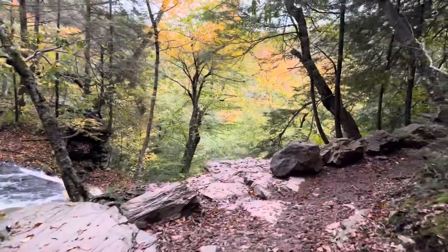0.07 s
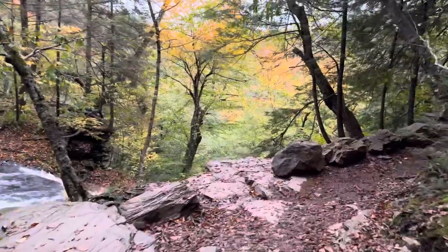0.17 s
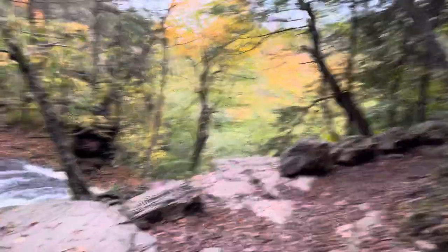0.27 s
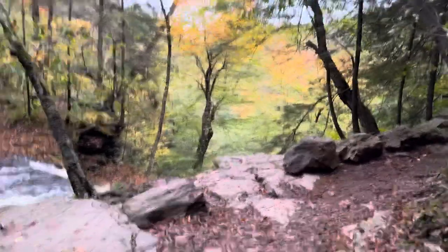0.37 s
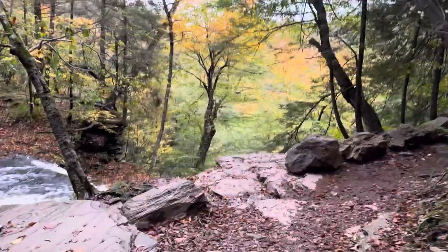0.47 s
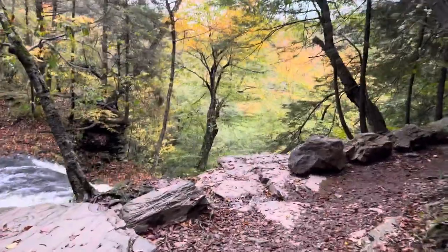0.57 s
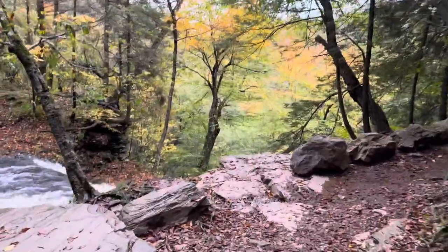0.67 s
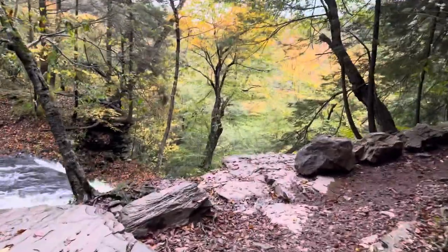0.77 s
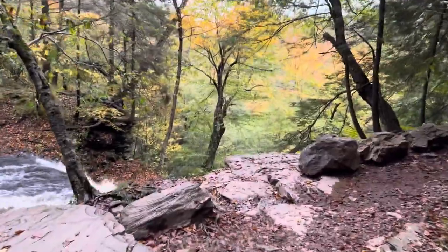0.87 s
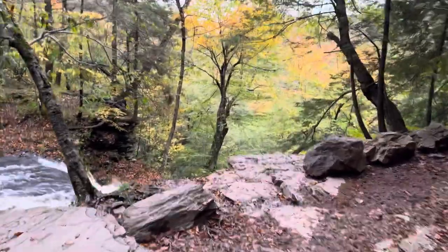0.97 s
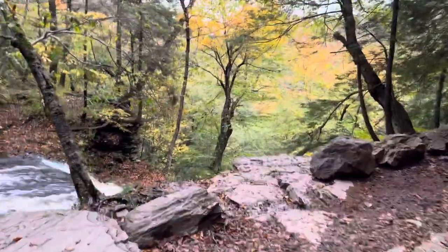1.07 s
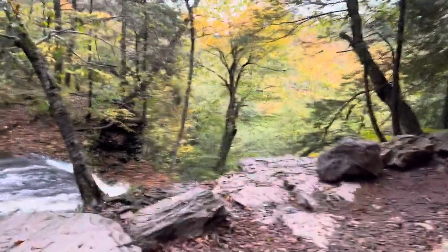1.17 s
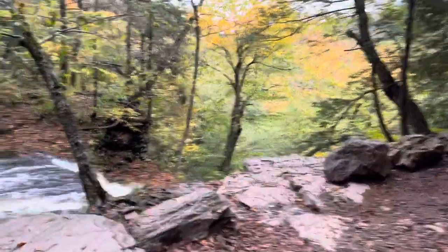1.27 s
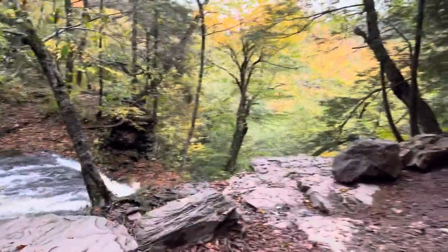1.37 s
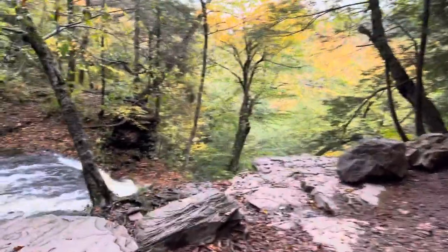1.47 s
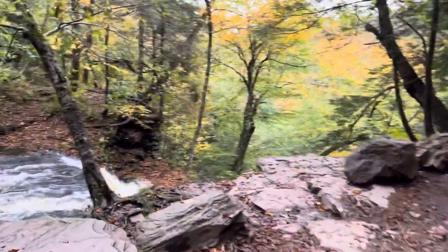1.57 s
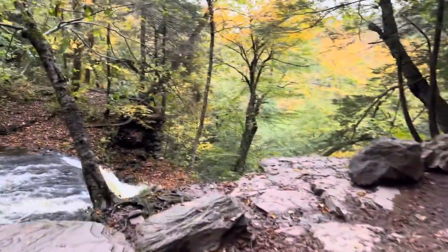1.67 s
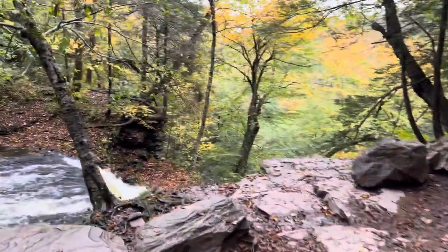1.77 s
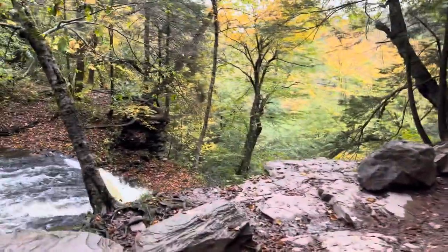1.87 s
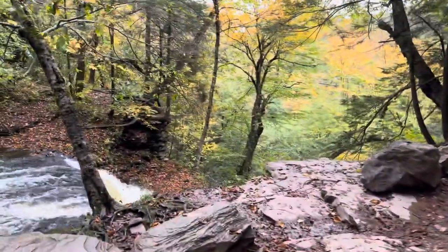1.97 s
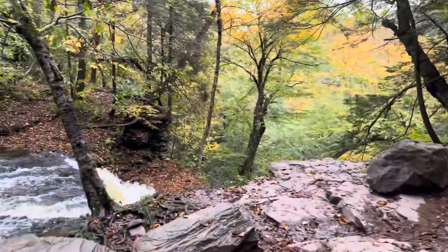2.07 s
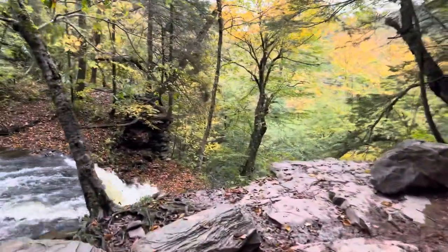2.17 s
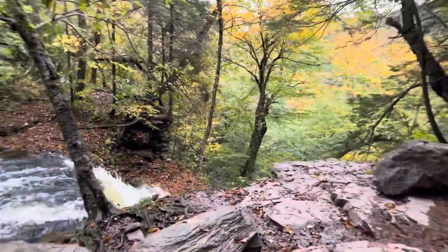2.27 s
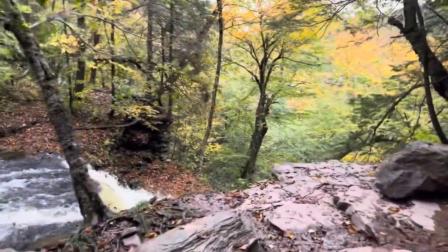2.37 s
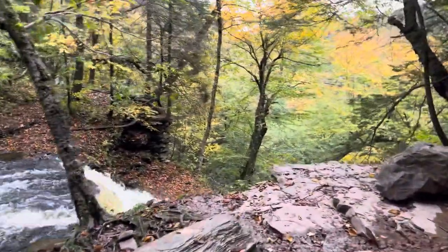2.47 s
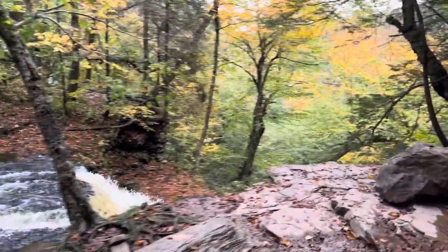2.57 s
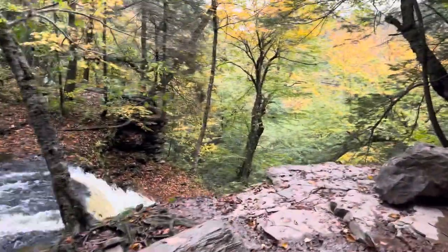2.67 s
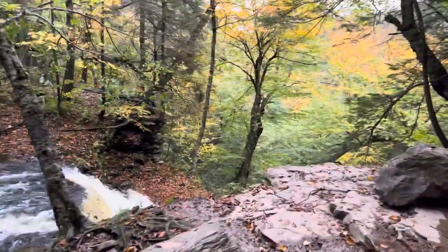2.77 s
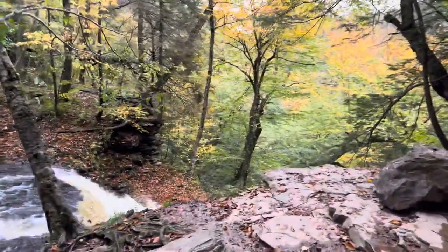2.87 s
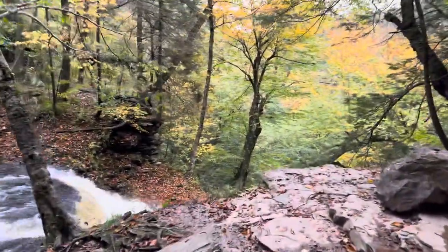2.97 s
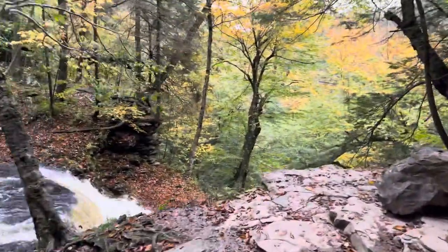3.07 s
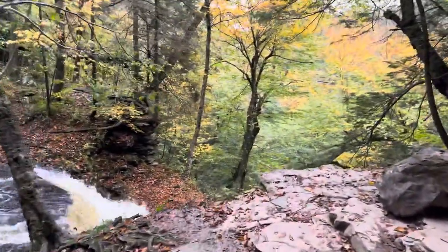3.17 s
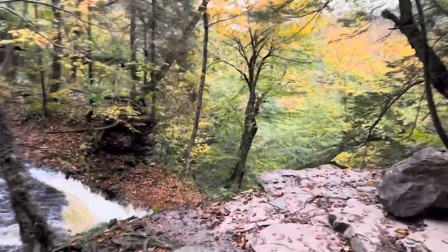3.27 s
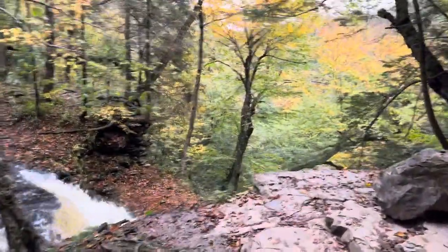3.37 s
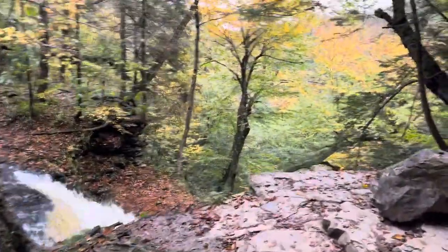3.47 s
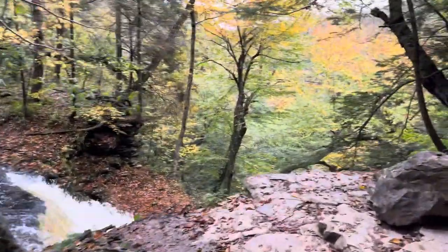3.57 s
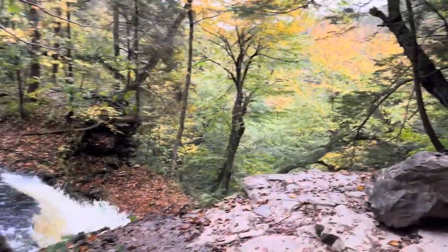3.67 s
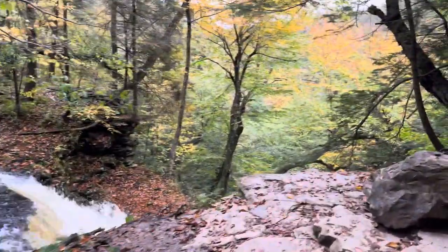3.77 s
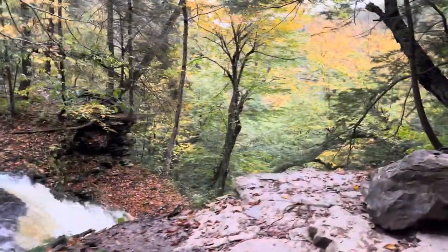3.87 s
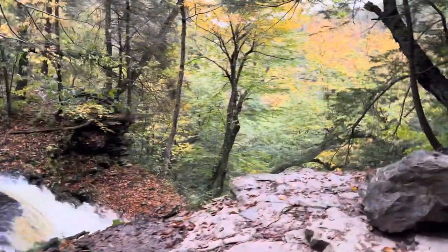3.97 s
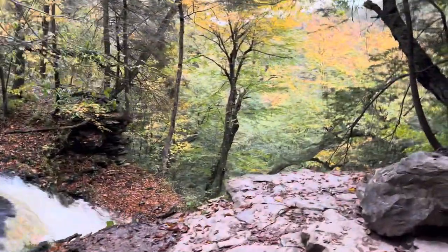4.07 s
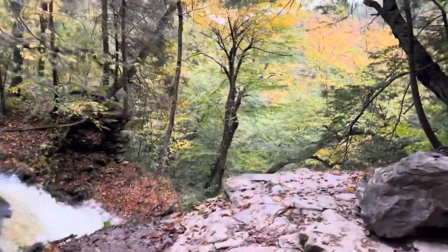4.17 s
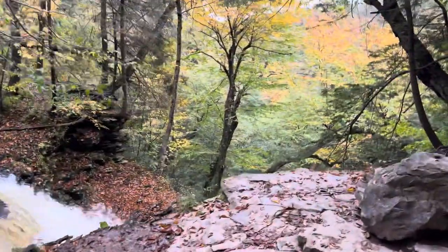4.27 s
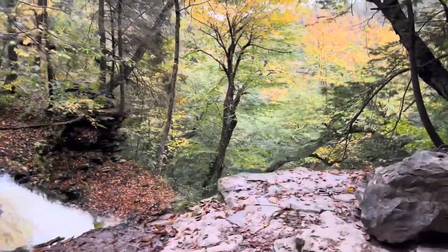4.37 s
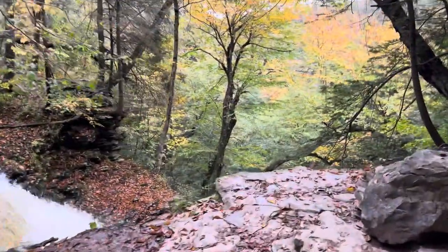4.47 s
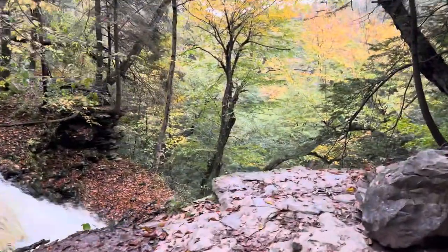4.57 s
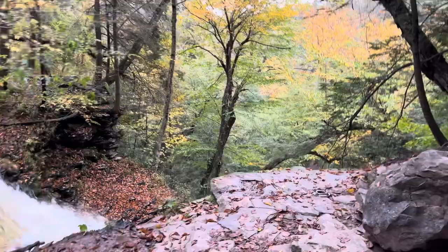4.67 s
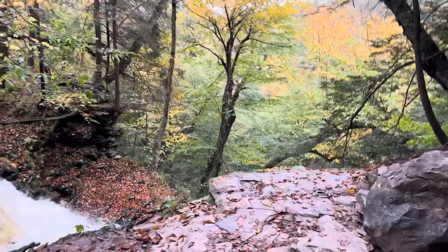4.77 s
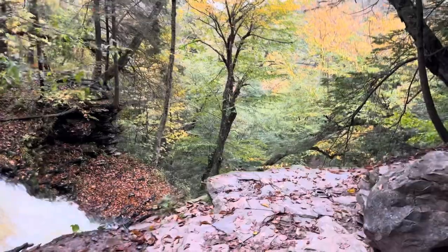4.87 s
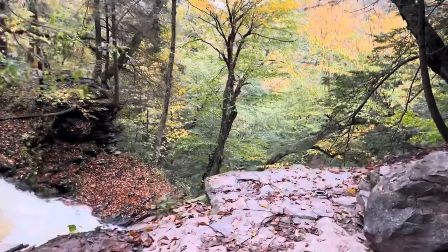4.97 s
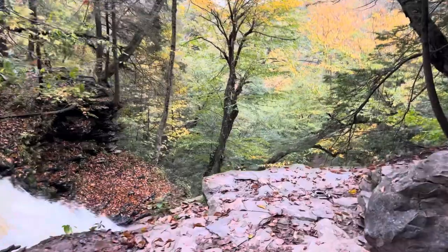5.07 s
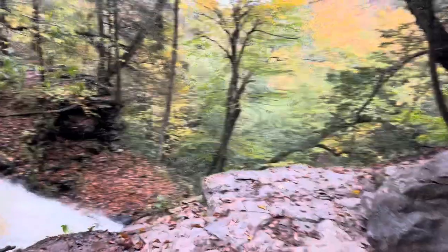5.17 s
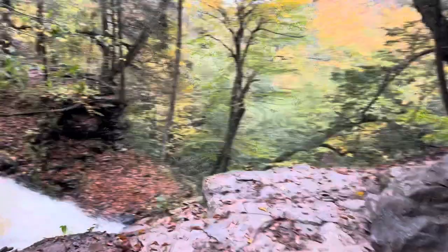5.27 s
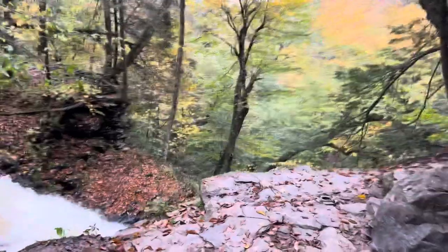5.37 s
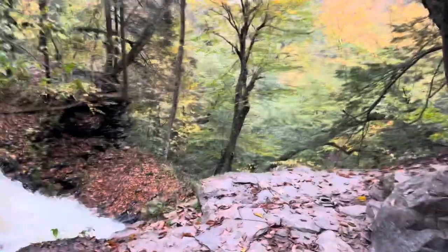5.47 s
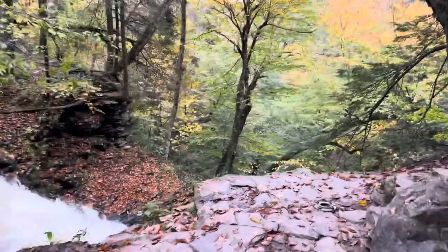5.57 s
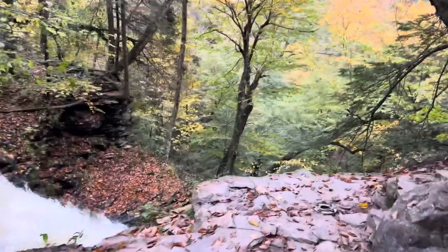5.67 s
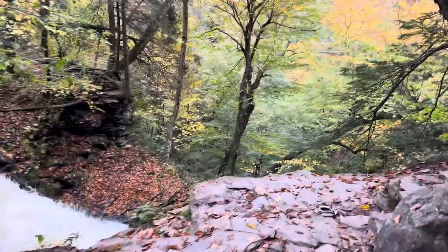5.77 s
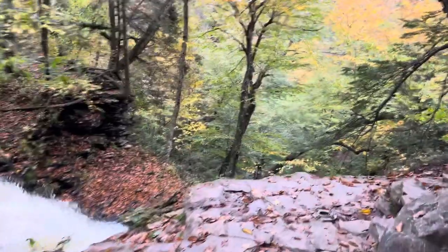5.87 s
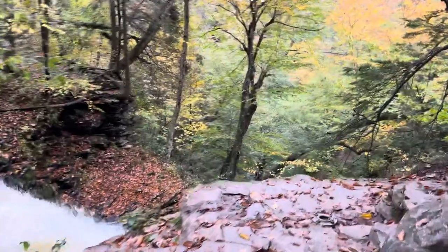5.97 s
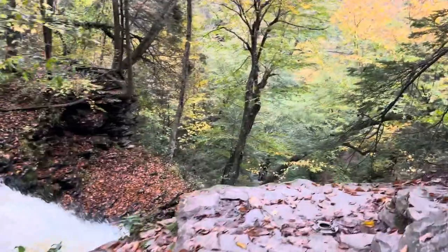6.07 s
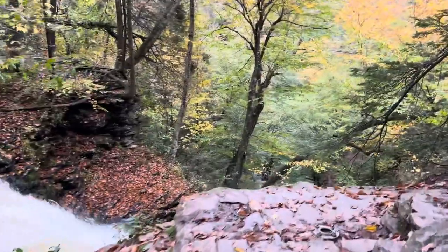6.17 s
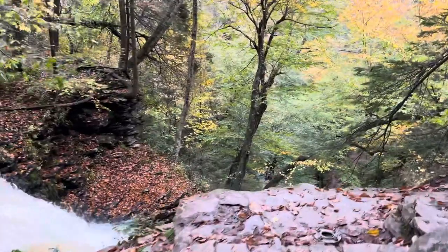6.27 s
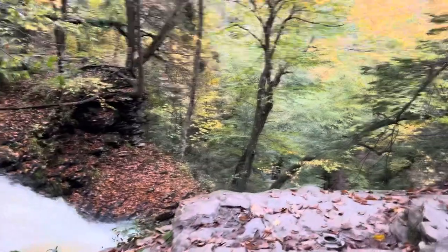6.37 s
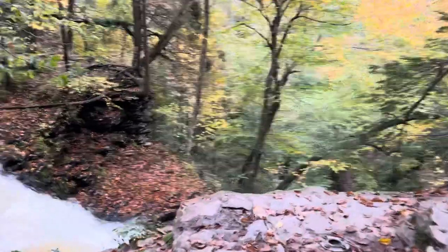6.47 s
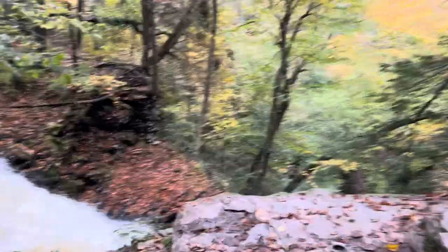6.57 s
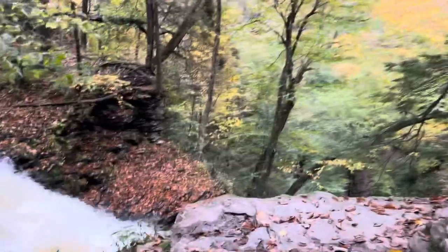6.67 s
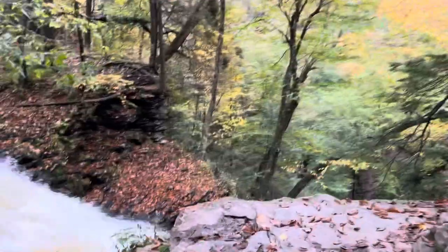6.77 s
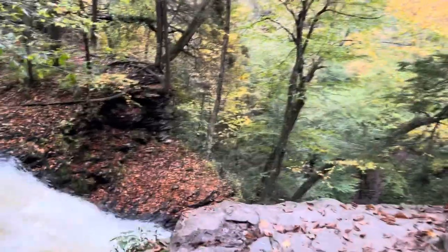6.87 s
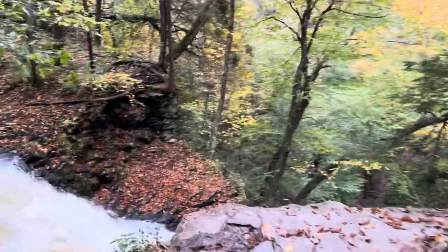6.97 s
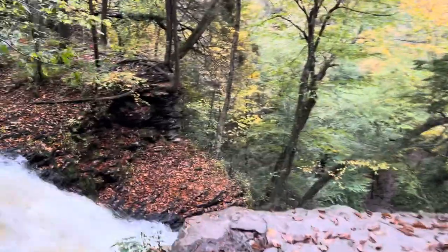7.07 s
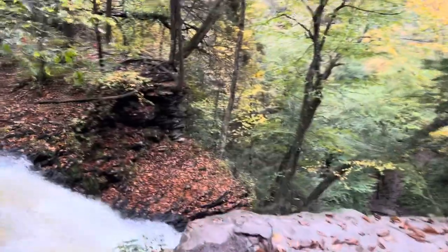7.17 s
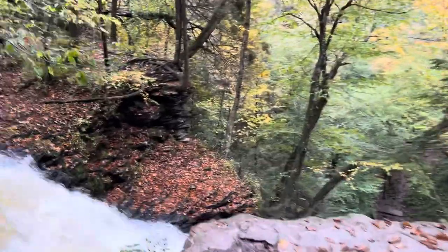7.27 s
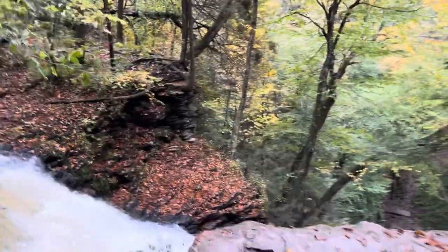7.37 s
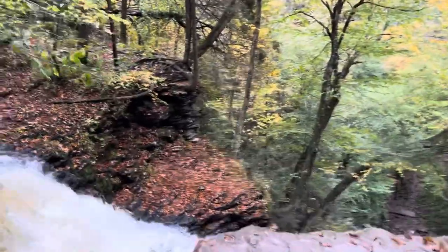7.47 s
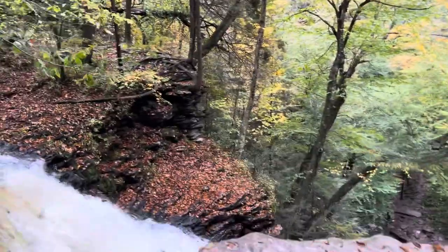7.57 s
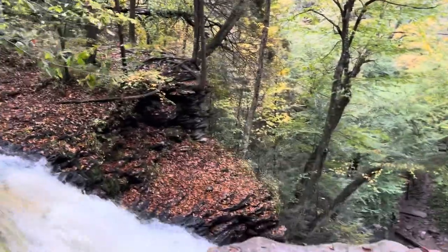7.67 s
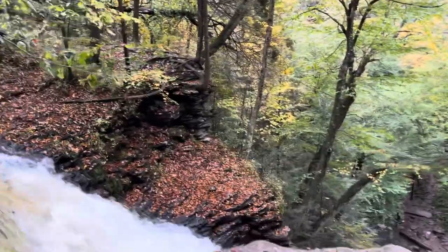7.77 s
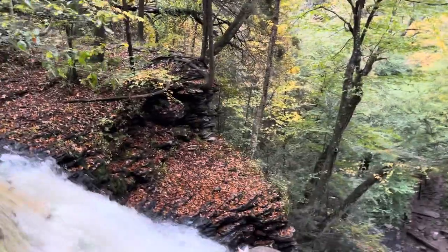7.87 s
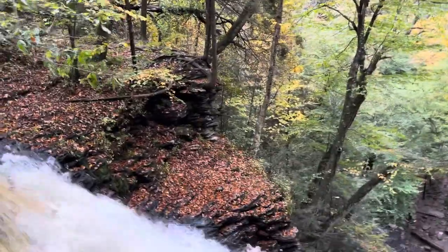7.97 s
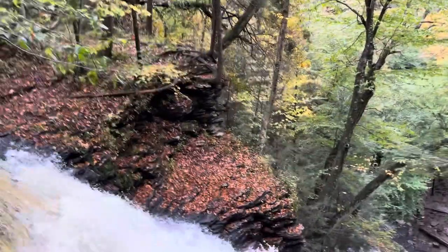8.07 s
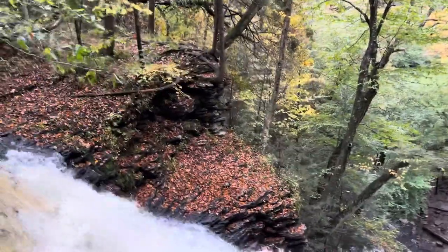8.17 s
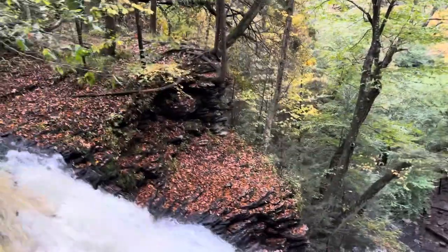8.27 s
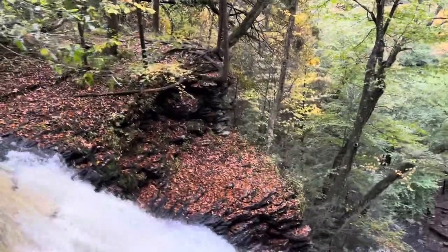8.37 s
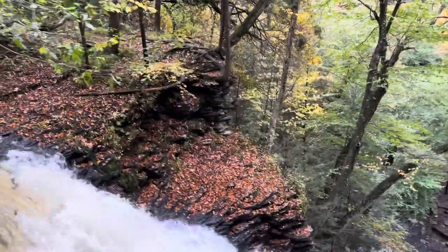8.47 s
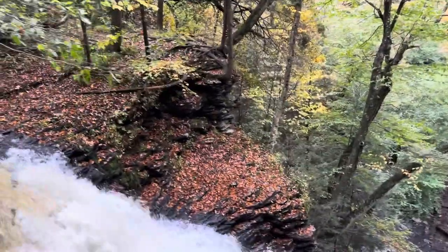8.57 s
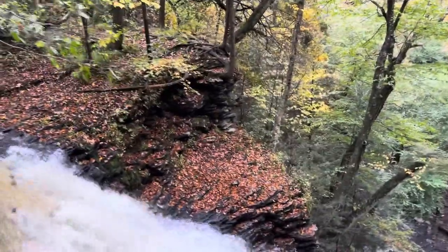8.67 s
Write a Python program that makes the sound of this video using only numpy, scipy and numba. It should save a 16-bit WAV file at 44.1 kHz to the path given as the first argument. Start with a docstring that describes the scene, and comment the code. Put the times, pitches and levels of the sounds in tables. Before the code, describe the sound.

A heavy waterfall roars steadily with deep rumble and broad white-water rush, growing louder and brighter as the listener walks to the brink.

```python
"""A deep rumble and broad rush: a waterfall in heavy flow, heard on a phone carried over bare rock to the brink.
The plunge pool booms and surges: banded turbulent noise plus the decaying sines of large air pockets.
White water (noise, small bubbles, splash clusters) and spray (bright noise, tiny bubbles) lie farther off.
All three grow louder as their distances shrink; bands of the roar swell and thin out, from splashes and rock.
The draught of the fall buffets the two microphone ports with low noise, harder in the gusts."""
import sys
import numpy as np
from scipy import signal
from scipy.fft import rfft, irfft
from scipy.io import wavfile
from scipy.ndimage import uniform_filter1d
from numba import njit

SR = 44100
rng = np.random.default_rng(int(sys.argv[2]) if len(sys.argv) > 2 else 0)


def wrap_up_sound(samples):
    """Save the sound to the file named by the first command line argument, as 16-bit audio."""
    columns = np.atleast_2d(samples).T
    # keep every value between -1 and 1, then stretch to whole-number steps
    tamed = np.clip(columns, -1, 1)
    steps = np.round(tamed * 32767).astype(np.int16)
    wavfile.write(sys.argv[1], SR, steps)


N = 384111
TIME = np.arange(N) / SR  # s
FREQ = np.maximum(np.fft.rfftfreq(N, 1 / SR), 1)  # Hz

# white-water spectrum, shared by foam, bubbles and splashes: freq_hz, density_db (per Hz)
RUSH_SPECTRUM = [(200, -26), (400, 0), (580, 1), (850, 0), (1030, -2.5), (1230, -1.45), (1450, -3.5),
                 (2300, -5.5), (3000, -8.5), (4500, -12), (8000, -14.5)]


def plunge_pool(near_db, opening_db_per_db=0.36, rim_hz=150):
    """Turbulence boils and driven-under air pockets ring; the part above the rim corner opens up on approach."""
    # pool spectrum: freq_hz, density_db (per Hz)
    pool_spectrum = [(25, -30), (40, -13.5), (60, -2), (95, -0.4), (170, 0.0), (260, -3), (400, -6.5),
                     (600, -13), (1200, -29.5)]
    boil = churn(pool_spectrum, surge_db=0.2, surge_rate_hz=9.8, flicker_db=0.46, flicker_rate_hz=14)
    pockets = bubbles(pool_spectrum, rate_hz=400, low_hz=59.5, high_hz=500,
                      cycles=6.6, rise=0.19, scatter_db=1.0)
    pool = stereo_image(boil + undb(-9.0) * pockets)
    return brighten(pool, rim_hz, opening_db_per_db * (near_db - near_db.mean()))


def tumbling():
    """Level in dB of the pool as heavy slugs of water land in it, with lulls between."""
    # surges and lulls: peak_s, change_db, length_s
    surges = [(.8, -2.5, .3), (1.12, 1, 0.23), (3.97, -2, .14), (4.78, 0, .3), (6.1, -0.5, .14),
              (6.23, -2.2, .1), (6.55, -2.5, .17), (7.1, 0.2, 0.18), (7.35, 1, .2), (7.63, -2, 0.1),
              (7.88, 1.3, .12), (8.04, 1.5, 0.089), (8.25, -1.5, 0.29), (8.532, 1, 0.07)]
    return sum(db * swell(s, length_s) for s, db, length_s in surges)


def white_water(near_db, opening_db_per_db=0.047, ledge_hz=900):
    """Foam tears over the ledges, so full of small bubbles and splashes that they fuse into one rush."""
    foam = churn(RUSH_SPECTRUM, surge_db=0.03, surge_rate_hz=12, flicker_db=0.4, flicker_rate_hz=18)
    gurgle = bubbles(RUSH_SPECTRUM, rate_hz=1300, low_hz=451.0, high_hz=4512,
                     cycles=94, rise=0.036, scatter_db=2.5)
    water = stereo_image(foam + undb(-7.5) * gurgle + undb(-8.0) * splashes())
    return unit(brighten(water, ledge_hz, opening_db_per_db * (near_db - near_db.mean())))


def splashes(rate_hz=200, length_s=.035, low_hz=1000, high_hz=7000, spread_octaves=0.074,
             cycles=36, scatter_db=1.3, count=22):
    """Lumps of water slap the ledges; each throws up a short cluster of bubbles of about one size."""
    lumps = int(rate_hz * N / SR)
    when, pitch = rng.random((lumps, 2)).T[:, :, None]
    delay, detune, way = rng.random((lumps, 3, count)).transpose(1, 0, 2)
    hz = low_hz * (high_hz / low_hz) ** pitch
    hz = hz * 2 ** (spread_octaves * (2 * detune - 1))  # plus or minus the spread
    strength = hz * undb(scatter_db * rng.standard_normal((lumps, 1)))
    start = when + delay ** 2 * length_s * SR / N  # densest at the slap
    angle = 2 * np.pi * way
    rings = ring(start.ravel(), hz.ravel(), strength.ravel(), angle.ravel(), float(cycles), 0.)
    return unit(colour(rings, RUSH_SPECTRUM))


def spray(near_db, opening_db_per_db=0.89, brink_hz=10000, mist_hz=13500):
    """Droplets hiss and tiny bubbles fizz; the finest hiss comes out from behind the brink as it nears."""
    # spray spectrum: freq_hz, density_db (per Hz)
    spray_spectrum = [(1200, -19), (2500, -5.5), (3500, -.5), (4500, 0), (6000, -.6), (7300, .6),
                      (8000, .6), (9000, 3.4), (9900, -.7), (10700, -5.8), (11600, -6.8), (15600, -6.6)]
    # at the edge the finest spray is in plain view
    edge_s, edge_length_s, edge_db = 8.7, 1.8, 4
    mist = churn(spray_spectrum, surge_db=-0.12, surge_rate_hz=12, flicker_db=1.2, flicker_rate_hz=28)
    fizz = bubbles(spray_spectrum, rate_hz=4500, low_hz=2500, high_hz=15000,
                   cycles=120, rise=.03, scatter_db=2.8)
    hiss = stereo_image(mist + undb(-5.5) * fizz)
    hiss = brighten(hiss, brink_hz, opening_db_per_db * (near_db - near_db.mean()))
    return brighten(hiss, mist_hz, edge_db * swell(edge_s, edge_length_s))


def buffeting(shared=0.3):
    """Eddies thump on each port, harder in the gusts; part of every eddy reaches the other port too."""
    # eddy spectrum: freq_hz, density_db (per Hz)
    eddy_spectrum = [(20, -36), (35, -9), (55, 0.5), (90, 0.5), (140, -6.5), (300, -21.5), (700, -50)]
    # gusts in the draught: peak_s, level_db, length_s
    gusts = [(0.588, -23.5, 0.034), (.89, -27, .12), (1.07, -23, .2), (1.65, -25, .22), (2.22, -24, 0.1),
             (2.617, -17, 0.089), (2.79, -20.5, .05), (3.11, -17, .06), (3.21, -19, .07),
             (3.349, -12.5, 0.063), (3.57, -19, 0.2), (3.717, -16, 0.045), (3.89, -23, .05),
             (4.06, -19, .07), (4.538, -15, .06), (4.66, -25, .12), (5.33, -26, .1), (5.51, -20, .04),
             (5.73, -29, .07), (5.85, -24, .04), (6.1, -19, .09), (7.27, -24, .13), (7.47, -20, .04),
             (7.89, -25, .05)]
    draught_db, right_minus_left_db = -43, 0.5
    # the draught freshens over one open stretch of the path
    open_s, open_length_s, open_db = 3.4, 4.2, 15.5
    eddies = churn(eddy_spectrum, surge_db=0.5, surge_rate_hz=14, flicker_db=-1.0, flicker_rate_hz=24)
    eddies = unit(eddies + shared * eddies[::-1])
    power = undb(draught_db + open_db * swell(open_s, open_length_s)) ** 2
    power = power + sum((undb(db) * swell(s, length_s)) ** 2 for s, db, length_s in gusts)
    lean = undb(right_minus_left_db * np.array([[-.5], [.5]]))
    return eddies * np.sqrt(power) * lean


def shifting_bands(water, drift_octaves=0.023, drift_rate_hz=1.68, waver=0.24, waver_rate_hz=4.5, size=2048):
    """Bands of the roar swell and thin out in turn, some from splashes, some from rock; they slide and waver."""
    # bands of the roar: start_hz, end_hz, width_octaves, peak_db, peak_s, length_s
    roar_bands = [(580, 650, 0.36, -3.5, .6, 2.6), (274, 260, 0.33, 2.5, .9, 1.8),
                  (390, 350, 0.48, 2.4, 4.7, 3.2), (145, 170, 0.35, 2, 5, 1.9),
                  (150, 210, 0.98, 0.8, 7.2, 1), (1410, 940, 0.16, 2, 1, 6.1),
                  (1330, 1060, 0.23, 2.5, 6.9, 0.81), (1300, 1070, .33, 2.5, 8, 1),
                  (2400, 2200, .22, 3, 7.1, 0.72), (2450, 2240, .28, 2.5, 8.17, 0.89),
                  (1850, 1950, 0.27, -1.2, 7.7, 2.5), (520, 470, 0.95, -1.5, 8.1, 2.7),
                  (90, 90, 0.74, 2, 8.6, 1), (310, 270, 0.55, 1.3, 8.3, .6), (42, 46, .7, -8, 6.7, .5),
                  (870, 1000, 0.25, 2.5, .2, 1), (342, 330, .4, 1.5, .2, 1),
                  (1130, 1100, .35, -2, 1.2, 0.76), (160, 160, .4, 1.5, 2, 1.8),
                  (1600, 1550, .3, -1.7, 6.9, .9)]
    hz, s, frames = signal.stft(water, SR, nperseg=size)
    bin_hz = np.maximum(hz, 1)[:, None]
    db = 0
    for start_hz, end_hz, width_octaves, peak_db, peak_s, length_s in roar_bands:
        centre_hz = start_hz * (end_hz / start_hz) ** (s / s[-1])
        drift = drift_octaves * np.interp(s, TIME, walk(drift_rate_hz))
        away_octaves = np.log2(bin_hz / centre_hz) + drift
        depth = swell(peak_s, length_s) * (1 + waver * walk(waver_rate_hz))
        shape = .5 ** ((2 * away_octaves / width_octaves) ** 2)
        db = db + peak_db * np.interp(s, TIME, depth) * shape
    return signal.istft(frames * undb(db), SR, nperseg=size)[1][:, :N]


def nearness(beyond_m, aside_m):
    """Level in dB of a source as a steady walk brings it closer: 6 dB more at half the distance."""
    start_m, pace_m_s = 10.41, 1.116
    ahead_m = start_m - pace_m_s * TIME + beyond_m
    return -20 * np.log10(np.hypot(ahead_m, aside_m))


def stereo_image(streams):
    """Two unrelated streams become left and right, with likeness, level and phase set by frequency."""
    # stereo image: freq_hz, likeness (0-1), left_minus_right_db, left_lead_rad
    image_table = [(60, .97, -.3, 0), (200, .97, .6, 0), (370, .92, 1.7, 0), (620, .58, -.3, .1),
                   (900, .6, 0, .5), (1200, .62, .4, .15), (1650, .36, 1.4, 1.4), (2250, .47, 2.1, .3),
                   (2900, .25, .4, -1.5), (4000, .33, -.4, -.5), (5400, .16, -2.5, -.5),
                   (6200, .38, -2.2, -1), (7400, .6, -1.7, .3), (8000, .45, -3, 1.6), (8500, .91, 0, 2.9),
                   (9500, .91, 0, 3.4), (10600, .85, 0, 6), (11700, .85, 0, 6.6), (13000, .85, 0, 9.1),
                   (14100, .85, 0, 9.8), (15200, .85, 0, 12.4)]
    likeness, lean_db, lead_rad = in_frequency(image_table)
    likeness = np.clip(likeness, 0, .99)
    mid, side = rfft(streams) * np.sqrt([1 + likeness, 1 - likeness])
    left = (mid + side) * undb(lean_db / 2) * np.exp(1j * lead_rad)
    right = (mid - side) * undb(-lean_db / 2)
    return unit(irfft(np.array([left, right]), N))


def churn(table, surge_db, surge_rate_hz, flicker_db, flicker_rate_hz, count=7):
    """Two streams of turbulence in one colour: the bands surge together, and each also flickers alone."""
    noise = rfft(rng.standard_normal((2, N)))
    place = np.interp(np.log(FREQ), np.log([table[0][0], table[-1][0]]), [0, count - 1])
    out = 0
    for k in range(count):
        band = irfft(noise * np.maximum(1 - abs(place - k), 0), N)  # overlapping triangles
        out = out + band * undb(flicker_db * walk(flicker_rate_hz))
    return unit(colour(out * undb(surge_db * walk(surge_rate_hz)), table))


def bubbles(table, rate_hz, low_hz, high_hz, cycles, rise, scatter_db):
    """Two streams of ringing bubbles in one colour, of mixed sizes and directions; a few stand out."""
    when, pitch, luck, way = rng.random((int(rate_hz * N / SR), 4)).T
    hz = low_hz * (high_hz / low_hz) ** pitch
    # small bubbles die sooner, so they start stronger to fill the spectrum evenly
    strength = hz * undb(-scatter_db * np.log(np.maximum(luck, np.exp(-5))))
    rings = ring(when, hz, strength, 2 * np.pi * way, float(cycles), float(rise))
    return unit(colour(rings, table))


@njit
def ring(when, hz, strength, angle, cycles, rise):
    """Each bubble is a sine that dies by 40 dB over its cycles while its pitch rises by a fraction."""
    out = np.zeros((2, N))
    for k in range(len(when)):
        start = int(when[k] * N)
        life = int(cycles * SR / hz[k]) + 2  # samples
        step = 2 * np.pi * hz[k] / SR
        z = strength[k] + 0j
        turn = np.exp(1j * step - np.log(100) / life)
        glide = np.exp(1j * step * rise / life)
        first, second = np.cos(angle[k]), np.sin(angle[k])
        for i in range(start, min(start + life, N)):
            z, turn = z * turn, turn * glide
            out[0, i] += first * z.imag
            out[1, i] += second * z.imag
    return out


def brighten(x, corner_hz, db):
    """Raise the part of x above the corner by a level that changes in time."""
    upper = irfft(rfft(x) * (1 - 1 / (1 + (FREQ / corner_hz) ** 6)), N)
    return x + upper * (undb(db) - 1)


def colour(x, table):
    """Give x a spectrum that falls away steeply past the ends of the table."""
    skirts = np.minimum(FREQ / table[0][0], 1) * np.minimum(table[-1][0] / FREQ, 1)
    return irfft(rfft(x) * undb(in_frequency(table)[0]) * skirts ** 2, N)


def in_frequency(table):
    """The columns of a spectrum table at every bin, interpolated over log frequency."""
    hz, *columns = np.transpose(table)
    return [np.interp(np.log(FREQ), np.log(hz), c) for c in columns]


def walk(rate_hz):
    """Smooth random curve that changes about rate_hz times a second; rms 1."""
    hold = max(int(SR / rate_hz), 1)
    steps = np.repeat(rng.standard_normal(N // hold + 2), hold)
    return unit(uniform_filter1d(steps, hold)[:N])


def swell(peak_s, length_s):
    """A smooth rise to 1 and fall, above one half for its length."""
    return .5 ** ((2 * (TIME - peak_s) / length_s) ** 2)


def undb(db):
    """Decibels to gain."""
    return 10 ** (np.asarray(db) / 20)


def unit(x):
    """Scale to an rms of 1."""
    return x / np.sqrt(np.mean(x ** 2))


def scene():
    """The three voices of the fall swell as their distance shrinks, with the draught on top."""
    # a lip of rock screens the white water in passing
    lip_s, lip_length_s, lip_db = 6.14, 1, -1
    # offset = nominal level at 1 m; beyond = past the edge; aside = below and beside the path
    pool_db = -0.49 + nearness(beyond_m=0.22, aside_m=5.06)
    rush_db = 1.07 + nearness(beyond_m=3.94, aside_m=3.44) + lip_db * swell(lip_s, lip_length_s)
    spray_db = 0.8 + nearness(beyond_m=5.34, aside_m=8)
    pool = plunge_pool(pool_db) * undb(pool_db + tumbling())
    rush = white_water(rush_db) * undb(rush_db)
    hiss = spray(spray_db) * undb(spray_db)
    return shifting_bands(pool + rush + hiss) + buffeting()


def record(dry):
    """The phone clips peaks at full scale and cuts the top with a steep elliptic low-pass."""
    top_hz = 15680
    low_pass = signal.ellip(10, .1, 70, top_hz, fs=SR, output="sos")
    return signal.sosfilt(low_pass, np.clip(dry, -1, 1))


dry = scene()
out = record(dry)
wrap_up_sound(out)
```